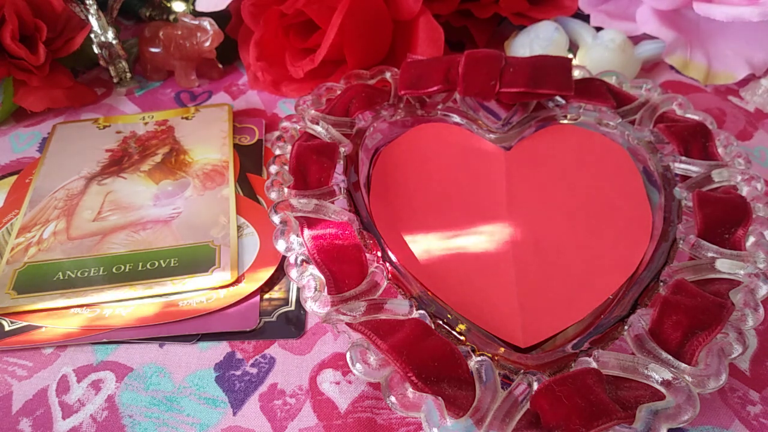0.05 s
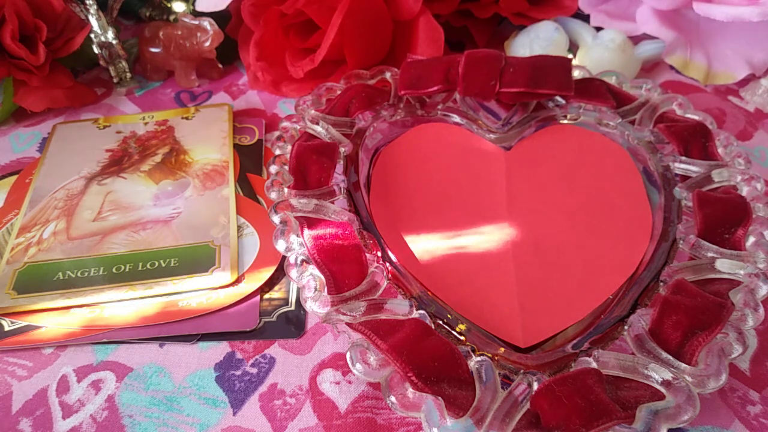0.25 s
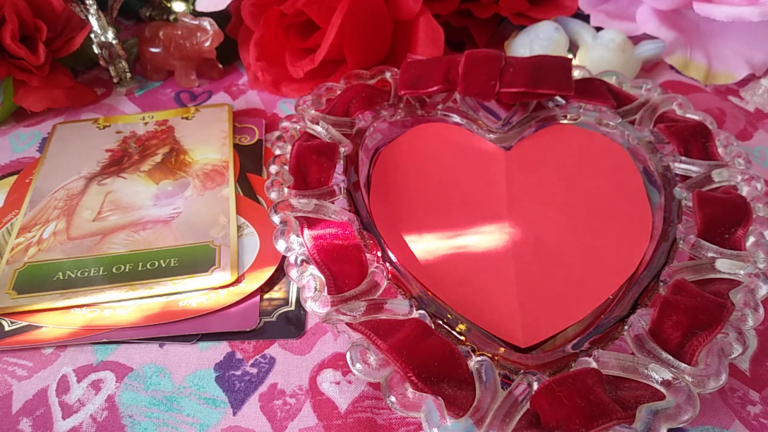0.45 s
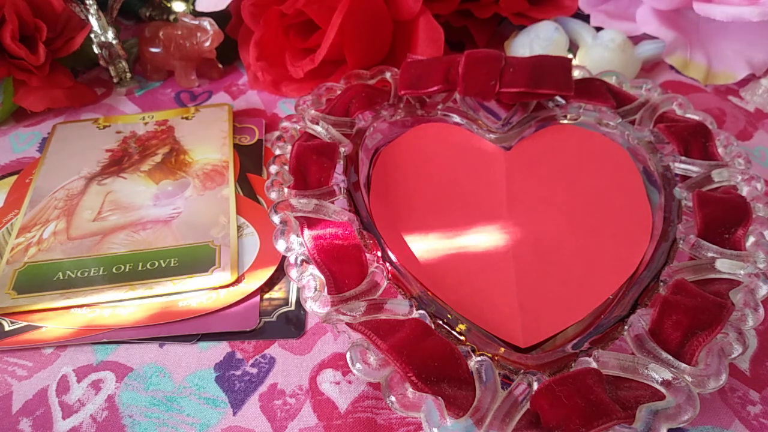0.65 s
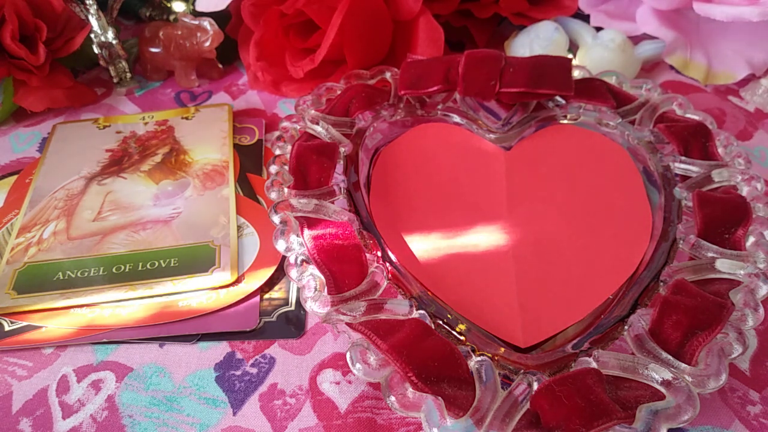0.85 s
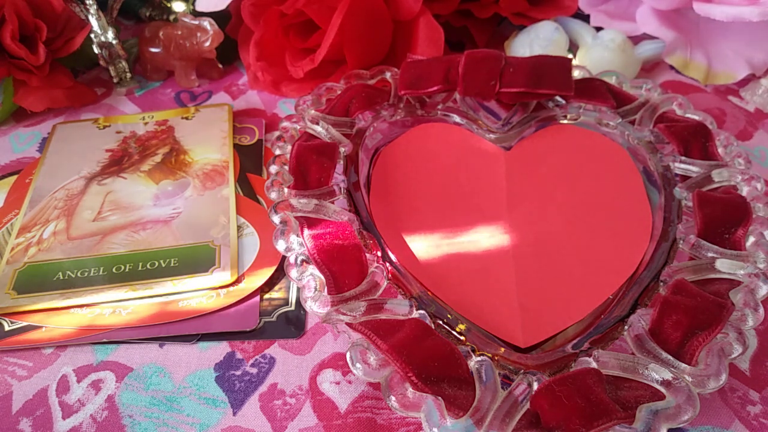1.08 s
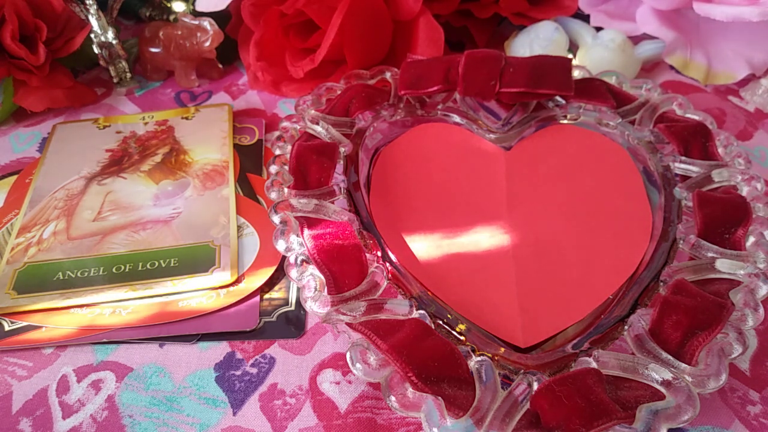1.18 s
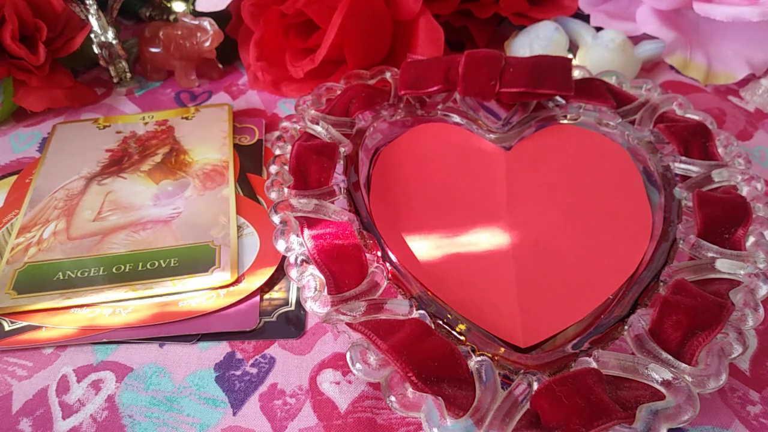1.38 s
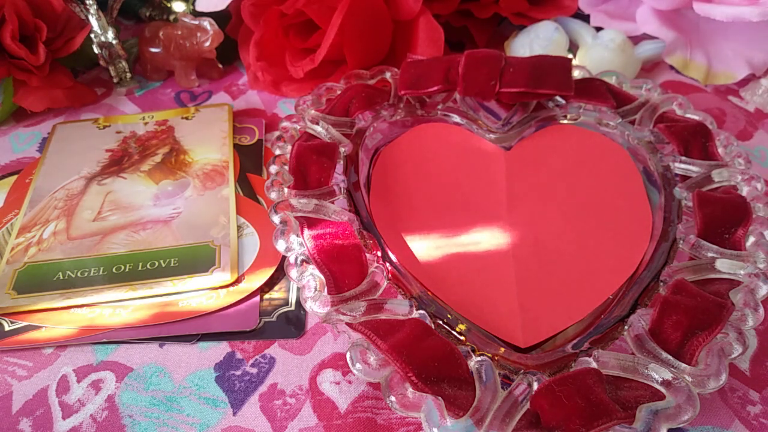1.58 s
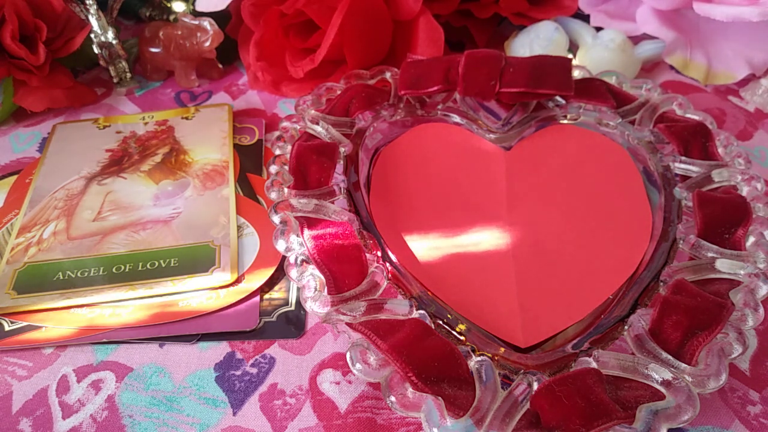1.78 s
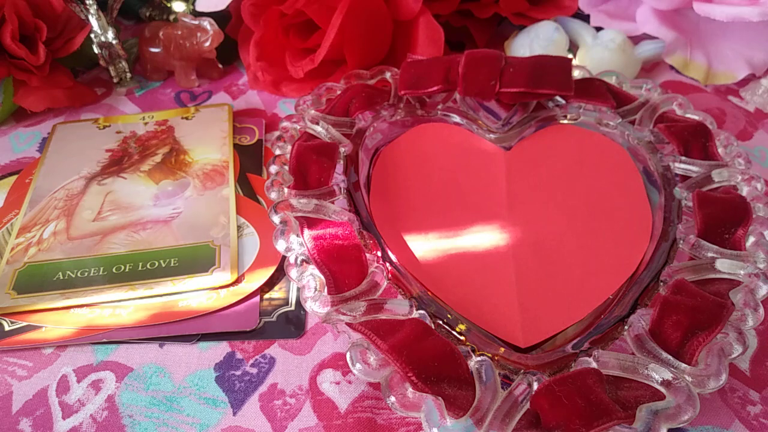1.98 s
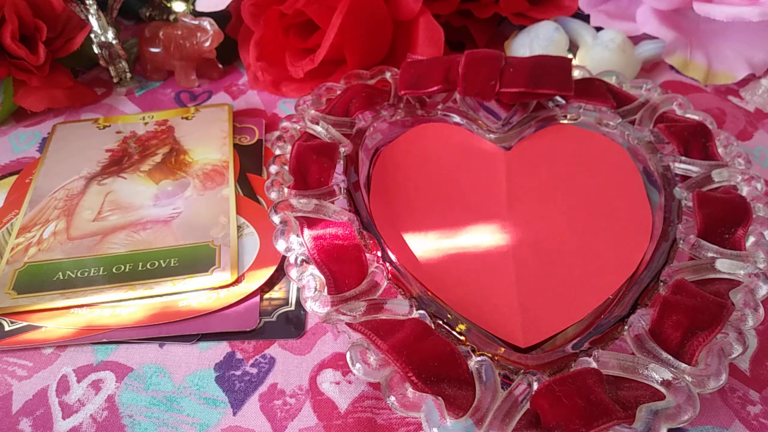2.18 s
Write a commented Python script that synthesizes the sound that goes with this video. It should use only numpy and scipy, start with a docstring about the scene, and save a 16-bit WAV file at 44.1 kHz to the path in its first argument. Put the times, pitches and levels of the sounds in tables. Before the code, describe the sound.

Small metal charms are stirred in a bowl, close up in a fairly dry room. A steady bright clatter with hollow rumble swells to its busiest at 0.7-0.9 seconds, with hard clacks and ringing bowl strikes. It thins after 1.0, stirs briefly around 1.13-1.3, then falls to faint ticks until 1.7. Jingling resumes by 1.8, with sharp clinks near 2.0, and continues to the end.

```python
"""On a table, a hand stirs a pile of small metal charms in a bowl, eases off briefly, and stirs again.
Thousands of random impacts excite damped modes: a clatter, a high tinkle and a hollow rumble.
The same impacts drive the modes of the bowl, which hums. Now and then a charm strikes the bowl wall,
and one bounces to rest; single clacks, pings and ticks of charms stand out, with soft low bumps.
A short tail of decaying noise adds reflections to the charms."""
import sys
import numpy as np
from scipy import signal
from scipy.io import wavfile

SR = 44100
rng = np.random.default_rng(int(sys.argv[2]) if len(sys.argv) > 2 else 0)


def to_wav(s):
    """Save 16-bit WAV."""
    ch = np.atleast_2d(s).T  # columns
    pcm = np.round(np.clip(ch, -1, 1) * 32767)  # PCM
    wavfile.write(sys.argv[1], SR, pcm.astype(np.int16))


N = 98651
TIME = np.arange(N) / SR  # s
RING = TIME[:SR // 3]  # s, time axis of one short sound
SMALL_HZ = 576  # small objects radiate little below this


def amp(db):
    """Level law: decibels to amplitude gain."""
    return 10 ** (np.asarray(db) / 20)


def evened(x):
    """Power normalisation: scales to an rms of one."""
    return x / np.sqrt(np.mean(x ** 2) + 1e-20)


def unit(rows):
    """Energy normalisation: scales each sound to an energy of one."""
    return rows / np.linalg.norm(rows, axis=-1, keepdims=True)


def add(mix, s, sound):
    """Superposition: adds a sound into the mix, in place, from time s."""
    part = mix[max(round(s * SR), 0):][:len(sound)]
    part += sound[:len(part)]


def fade(t60):
    """Exponential decay: falls by 60 dB in t60 seconds."""
    return np.exp(-np.log(1000) * RING / t60)


def mode(hz, t60):
    """Damped oscillation: one sine partial dying exponentially."""
    return np.sin(2 * np.pi * hz * RING) * fade(t60)


def burst(t60):
    """Impulsive noise: white noise dying exponentially."""
    return rng.standard_normal(len(RING)) * fade(t60)


def through(x, response):
    """Linear system: convolves with an impulse response, keeping the length."""
    return signal.oaconvolve(x, response)[:len(x)]


def colour(x, points, size=4096):
    """Minimum-phase filtering: a causal filter of unit energy with the given spectrum."""
    hz, db = np.transpose(points)
    bins_hz = abs(np.fft.fftfreq(size, 1 / SR))
    log_gain = np.log(amp(np.interp(np.log(bins_hz + 1), np.log(hz), db)))
    # the Hilbert transform of the log gain supplies the minimum phase
    spectrum = np.exp(np.conj(signal.hilbert(log_gain)))
    taps = np.fft.ifft(spectrum).real[:size // 2]
    return through(x, unit(taps))


def high_pass(x, hz, order=4):
    """Butterworth high-pass: removes the bass steeply."""
    return signal.sosfilt(signal.butter(order, hz, "high", fs=SR, output="sos"), x)


SPREAD_DB, MOST_SPREAD = 3.5, 3.5  # scale of the scatter in touch size, and its cap in multiples of that
THINNING = 0.35  # gentler stirring makes fewer contacts, by this power of its strength


def contacts(strength, most_per_s):
    """Random impact process: many weak touches, a few strong, and sparser as the stirring weakens."""
    share = (strength / strength.max()) ** THINNING
    scatter_db = SPREAD_DB * np.minimum(rng.exponential(1, N), MOST_SPREAD)
    size = amp(scatter_db) / np.sqrt(share)  # fewer touches are larger, holding the mean power
    sign = rng.choice([-1, 1], N)
    touched = rng.random(N) < share * most_per_s / SR
    return evened(size * sign * touched)


DAMPING_SPREAD = 0.29  # log-normal spread of t60 from charm to charm
TOUCH_T60 = 0.0035  # s, noise at the instant of touch


def pile(touches, lo_hz, hi_hz, t60, grit, count=36, size=4096):
    """Modal excitation: each touch ticks and rings one of many charms of differing pitch and damping."""
    t = RING[:size]
    hz = lo_hz + (hi_hz - lo_hz) * (np.arange(count) + rng.random(count)) / count
    dying = t60 * np.exp(DAMPING_SPREAD * rng.standard_normal(count))
    decay = np.exp(-np.log(1000) * t / dying[:, None])
    rings = unit(np.sin(2 * np.pi * hz[:, None] * t) * decay)
    touch_noise = unit(rng.standard_normal((count, size)) * fade(TOUCH_T60)[:size])
    charms = unit(rings + grit * touch_noise)
    which = rng.integers(0, count, N)
    out = np.zeros(N + size)
    for i in np.flatnonzero(touches):
        out[i:i + size] += touches[i] * charms[which[i]]
    return out[:N]


# course of the stirring before the layer gains: (t/s, rumble level/dB, clatter level/dB, tinkle level/dB)
STIR_COURSE = [(0, -29, -22.5, -32), (.095, -31.5, -27, -37.5), (.14, -29, -23.5, -32),
               (.21, -27.5, -23, -30.5), (.33, -30, -23.5, -33.5), (.455, -34, -27.5, -33.5),
               (.51, -29.5, -24, -32), (0.574, -38, -26.5, -30), (.625, -30, -24.5, -27.5),
               (.72, -32.5, -21.5, -29), (.8, -30.5, -21.5, -24.5), (.875, -34, -22, -27),
               (.975, -40, -30.5, -35.5), (1.05, -41, -31, -45.5), (1.121, -40.5, -41.5, -44),
               (1.131, -29.5, -26, -44), (1.17, -36, -31.5, -39), (1.191, -29.5, -25, -32.5),
               (1.255, -30.5, -27.5, -34), (1.381, -44.5, -38.5, -45.5), (1.46, -46.5, -44.5, -52),
               (1.52, -50, -50.5, -56), (1.66, -43.5, -41.5, -51), (1.803, -32, -29.5, -32.5),
               (1.9, -31, -23.5, -33), (2.07, -34, -22.5, -31), (2.199, -35, -28, -40.5),
               (2.237, -41, -30, -35)]
# relative spectra of hollow rumble, clatter, tinkle and deep layer: (f/Hz, level/dB)
HOLLOW_SPECTRUM = [(200, -62), (450, -11.5), (580, -1.5), (750, -4.5), (1400, 3.5), (2000, -17),
                   (4000, -60.5)]
CLATTER_SPECTRUM = [(300, -73), (900, -8), (1750, -6), (2400, 0.5), (3100, 1), (4000, -2), (4800, -2),
                    (5500, -6.5), (6800, -15.5), (10000, -19.5), (16000, -28)]
TINKLE_SPECTRUM = [(1000, -61), (5000, -45), (7000, -2.5), (8300, -3), (9800, 3), (11300, 3), (12500, -3),
                   (14200, -1.5), (16000, -8.5)]
DEEP_SPECTRUM = [(130, -37), (240, -9.5), (400, 5), (800, -25.5)]
# resonances of the bowl's hollow and the table: (f/Hz, bandwidth/Hz, relative level/dB)
CAVITY_MODES = [(816, 21, 2), (890.3, 15, 0.5)]
# pitches of the larger charms: (f/Hz)
LARGE_CHARMS = [2398, 2560, 2732, 2830, 3019, 3095, 3574, 3994, 4306]
# main modes of the bowl wall: (f/Hz, relative level when stirred/dB, t60/s)
BOWL_MODES = [(1277, -1.5, 0.12), (2144, 0, .12), (3206, 0, 0.11), (4427, -5.5, 0.076)]
MOST_CONTACTS_PER_S, MOST_CLINKS_PER_S = 3000, 40  # at the strongest stirring; clinks for each pitch
CLATTER_T60, TINKLE_T60, HOLLOW_T60, CHARM_T60 = 0.026, 0.051, 0.015, 0.044  # s
CLATTER_DB, TINKLE_DB, CHARMS_DB = -2.5, -1.45, -8  # layer gains of the metal
HOLLOW_DB, CAVITY_DB, HUM_DB, DEEP_DB = -3.5, -3, -7, -26  # layer gains of the vessel and deep layer
DEEP_GROWTH = 1.2  # the deep layer's level follows this power of the rumble level
LOW_CUT_HZ = 472  # for all layers but the deep one


def stirring():
    """Common excitation: the same touches drive pile, bowl and cavity; larger charms clink more rarely."""
    s, *levels = np.transpose(STIR_COURSE)
    low, mid, high = (amp(np.interp(TIME, s, db)) for db in levels)
    touches = contacts(mid, MOST_CONTACTS_PER_S)

    clatter_pile = pile(touches, 1450, 6360, CLATTER_T60, grit=1.5, count=60)
    clatter = mid * evened(colour(clatter_pile, CLATTER_SPECTRUM))
    tinkle_pile = pile(touches, 6500, 15800, TINKLE_T60, grit=0.85, count=128)
    tinkle = high * evened(colour(tinkle_pile, TINKLE_SPECTRUM))
    large = sum(through(contacts(mid, MOST_CLINKS_PER_S), mode(hz, CHARM_T60)) for hz in LARGE_CHARMS)
    clinks = mid * evened(large)

    hollow_pile = pile(touches, 297, 1512, HOLLOW_T60, grit=3.24)
    hollow = low * evened(colour(hollow_pile, HOLLOW_SPECTRUM))
    # bandwidth sets the decay of a resonance: t60 = ln(1000) / (pi * bandwidth)
    cavity_response = sum(amp(db) * unit(mode(hz, np.log(1000) / np.pi / width))
                          for hz, width, db in CAVITY_MODES)
    cavity = low * evened(through(touches, cavity_response))
    wall_response = sum(amp(db) * mode(hz, t60) for hz, db, t60 in BOWL_MODES)
    hum = np.sqrt(mid * low) * evened(through(touches, wall_response))
    deep_level = low.max() * (low / low.max()) ** DEEP_GROWTH
    deep = deep_level * evened(colour(touches, DEEP_SPECTRUM))

    metal = amp(CLATTER_DB) * clatter + amp(TINKLE_DB) * tinkle + amp(CHARMS_DB) * clinks
    vessel = amp(HOLLOW_DB) * hollow + amp(CAVITY_DB) * cavity + amp(HUM_DB) * hum
    return high_pass(metal + vessel, LOW_CUT_HZ, order=8) + amp(DEEP_DB) * deep


# overtones of the bowl wall: (f/Hz, level against the highest main mode/dB, t60/s)
WALL_OVERTONES = [(5740, -14, 0.24), (7200, -17, 0.1), (11100, -2.5, 0.037)]


def bowl(levels_db):
    """Modal superposition: the place of contact sets each main mode; overtones follow the highest."""
    main = sum(amp(db) * mode(hz, t60) for db, (hz, _, t60) in zip(levels_db, BOWL_MODES))
    overtones = sum(amp(levels_db[-1] + db) * mode(hz, t60) for hz, db, t60 in WALL_OVERTONES)
    return main + overtones


# charms striking the wall: (t/s, level/dB of each of the four main modes from the lowest, crack level/dB)
WALL_STRIKES = [(.7368, -15.5, -10, -12.5, -18.5, -29), (.8, -18, -25, -19, -32, -4),
                (.828, -13.5, -23, -21, -36, -30), (.876, -26, -17, -33, -25, -16),
                (.9405, -16.5, -11.5, -15, -21, -6), (.9848, -23, -23, -15, -27, -9.5),
                (1.0138, -34, -20.5, -18, -27, -17.5), (1.0355, -26, -30, -24.5, -41, -18),
                (1.051, -36, -27, -26, -29.5, -34), (1.9, -23, -27, -36, -25, -14),
                (1.982, -20, -26, -14, -22, -12), (1.9944, -14.5, -15.5, -11.5, -13, -13),
                (2.016, -38, -32, -33, -35, -23), (2.192, -24.5, -24, -22, -27.5, -30)]
# relative spectrum of the contact crack: (f/Hz, level/dB)
CRACK_SPECTRUM = [(400, -12), (800, 0.5), (4300, 3.5), (6000, -30), (16000, -13)]
CRACK_T60 = 0.0036  # s
CHOKE_S = 0.00067  # time constant with which a landing charm stops the earlier ring


def strikes():
    """Contact damping: a charm lands with a crack, stops the bowl's old ring and starts a new one."""
    out = np.zeros(N)
    for s, *levels_db, crack_db in WALL_STRIKES:
        out *= np.exp(-np.maximum(TIME - s, 0) / CHOKE_S)
        crack = amp(crack_db) * colour(burst(CRACK_T60), CRACK_SPECTRUM)
        add(out, s, bowl(levels_db) + crack)
    return out


# dull knocks of charm on charm: (t/s, f/Hz, level/dB)
CHARM_CLACKS = [(.211, 3050, -8), (0.2622, 2760, -5), (.302, 2420, -14), (.4339, 2140, -9.5),
                (.4955, 3660, -6.5), (.5621, 3700, -9.5), (0.6953, 2430, -7.5), (0.709, 2500, -9),
                (0.7818, 2540, -7.5), (0.782, 4170, -9), (.789, 2450, -1.5), (0.797, 3920, -7.5),
                (.867, 2720, -8.5), (1.133, 2920, -12.5), (1.3526, 3270, -21.5), (1.4915, 3220, -33),
                (1.6115, 3200, -28), (1.7567, 3680, -17), (1.7705, 3140, -14.5), (1.876, 3600, -11),
                (1.982, 3480, -2.5), (1.9896, 3180, -7.5), (2.158, 4400, -10.5)]
CLACK_T60 = 0.016  # s
CLACK_GRIT = 0.62  # gain of the contact noise
CLACK_PAIR_RATIO, CLACK_PAIR = 0.83, 0.19  # lower partial: frequency ratio to the first, and gain


def clacks():
    """Heavily damped impact: hard knocks between charms, choked at once by the pile."""
    out = np.zeros(N)
    onset = np.minimum(RING / 0.0002, 1)  # 0.2 ms rise
    for s, hz, db in CHARM_CLACKS:
        scrape = burst(0.0027)
        grit = colour(scrape, CLATTER_SPECTRUM) + 0.4 * colour(scrape, TINKLE_SPECTRUM)
        lower = mode(hz * CLACK_PAIR_RATIO, CLACK_T60)
        ring = 0.68 * mode(hz, CLACK_T60) + CLACK_PAIR * lower
        add(out, s, amp(db) * onset * (ring + CLACK_GRIT * grit))
    return out


# loose charms ringing clear: (t/s, f/Hz, level/dB, t60/s)
CLEAR_PINGS = [(.21, 12000, -24, .11), (.6, 12000, -22, 0.16), (.645, 11250, -19, 0.096),
               (0.669, 4830, -17.5, 0.089), (0.739, 8000, -15.5, 0.047), (0.771, 11450, -14, 0.011),
               (1.129, 10100, -25.5, 0.1), (1.21, 13450, -25, 0.14), (1.989, 13800, -28, 0.13),
               (2.123, 14100, -18.5, 0.047), (2.159, 10050, -16, 0.039)]
PING_PAIR = 0.19  # gain of the second partial


def pings():
    """Beating of near modes: a free charm ticks and rings with a close pair of partials."""
    out = np.zeros(N)
    for s, hz, db, t60 in CLEAR_PINGS:
        pair = mode(hz + rng.uniform(-350, 394), t60)
        tick = colour(burst(0.0092), TINKLE_SPECTRUM)
        add(out, s, amp(db) * (mode(hz, t60) + PING_PAIR * pair + tick))
    return out


# dry ticks of edge on edge: (t/s, level/dB)
EDGE_TICKS = [(0.497, -14), (1.134, -18.5), (1.184, -19), (1.263, -20.5), (1.296, -16), (1.555, -37),
              (1.6115, -32), (1.695, -32), (2.159, -15)]
TICK_T60 = 0.0046  # s


def ticks():
    """Broadband impulse: bright touches with no ring to speak of."""
    out = np.zeros(N)
    for s, db in EDGE_TICKS:
        add(out, s, amp(db) * colour(burst(TICK_T60), TINKLE_SPECTRUM))
    return out


# the bowl nudging the table: (t/s, level/dB)
TABLE_BUMPS = [(.803, -68), (1.133, -65), (1.977, -49)]
# relative spectrum of the thud: (f/Hz, level/dB)
THUD_SPECTRUM = [(30, 6.5), (80, 0), (200, -5), (400, -27), (2000, -70)]
BUMP_T60 = 0.05  # s


def bumps():
    """Structure-borne impact: soft low thuds through the table, as filtered noise bursts."""
    out = np.zeros(N)
    for s, db in TABLE_BUMPS:
        add(out, s, amp(db) * colour(burst(BUMP_T60), THUD_SPECTRUM))
    return out


ROOM_DB, ROOM_T60 = -9.5, 0.13  # dB, s


def room(x):
    """Diffuse reverberation: a short tail of decaying noise, starting 2 ms after the direct sound."""
    tail = burst(ROOM_T60) * (RING > 0.002)
    return through(x, unit(tail))


def scene():
    """Superposition of sources: the charms with their reflections, the struck bowl and the bumps."""
    charms = stirring() + high_pass(clacks() + pings() + ticks(), SMALL_HZ)
    reflections = amp(ROOM_DB) * room(charms)
    struck_bowl = high_pass(strikes(), SMALL_HZ)
    return (charms + reflections + struck_bowl + bumps())[None]


CEILING, EDGE_HZ = 0.92, 15900  # peak limit (full scale 1); upper band limit in Hz


def record(dry):
    """Soft saturation and band limiting: rounds off the loudest peaks, then removes the extreme treble."""
    rounded = dry / (1 + (dry / CEILING) ** 8) ** (1 / 8)
    low_pass = signal.firwin(401, EDGE_HZ, window=("kaiser", 8), fs=SR)
    return signal.oaconvolve(rounded, low_pass[None], "same")


dry = scene()
out = record(dry)
to_wav(out)
```